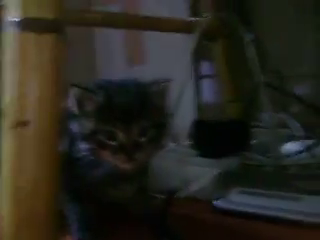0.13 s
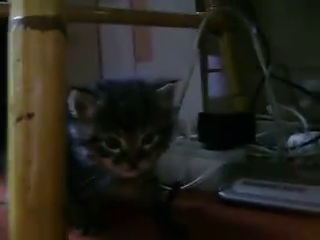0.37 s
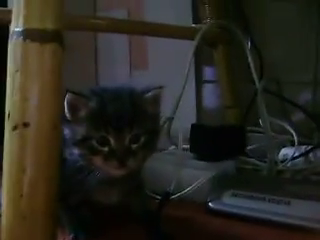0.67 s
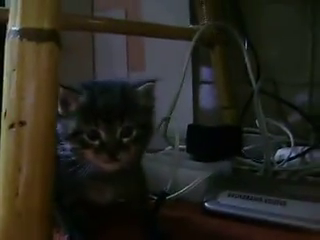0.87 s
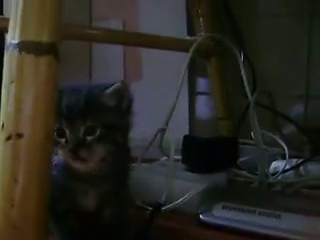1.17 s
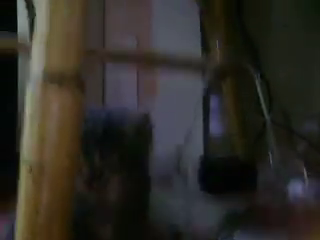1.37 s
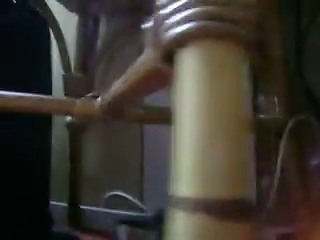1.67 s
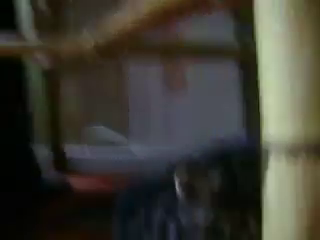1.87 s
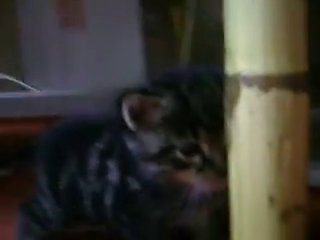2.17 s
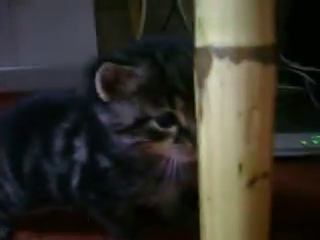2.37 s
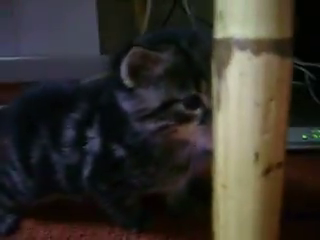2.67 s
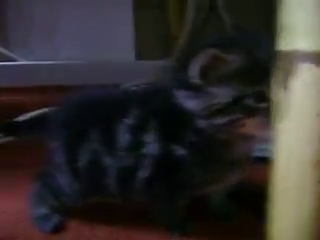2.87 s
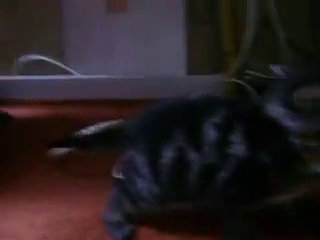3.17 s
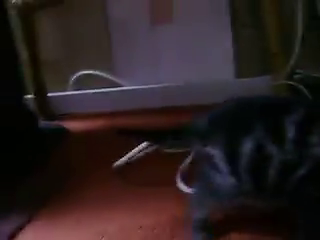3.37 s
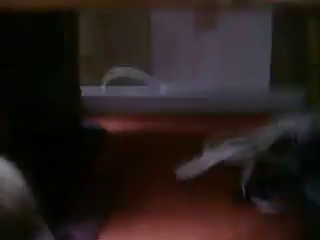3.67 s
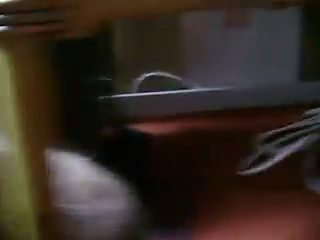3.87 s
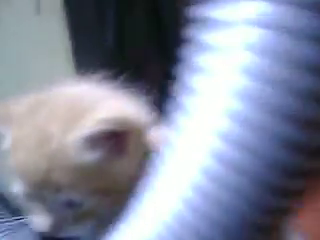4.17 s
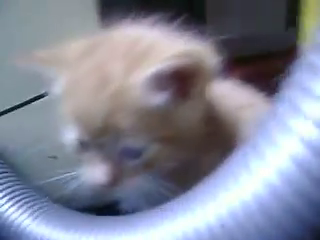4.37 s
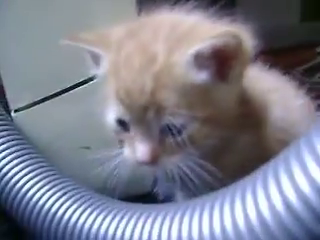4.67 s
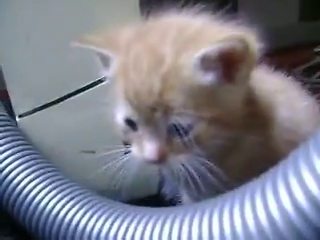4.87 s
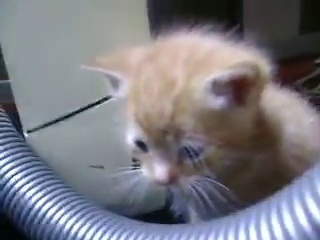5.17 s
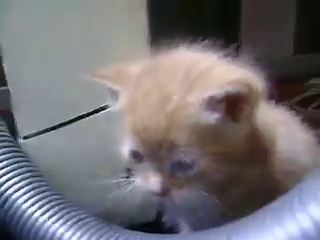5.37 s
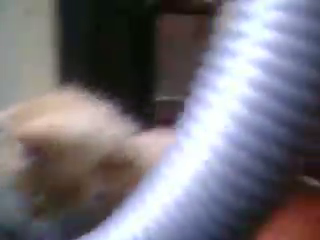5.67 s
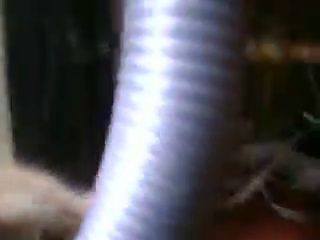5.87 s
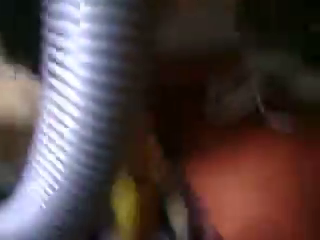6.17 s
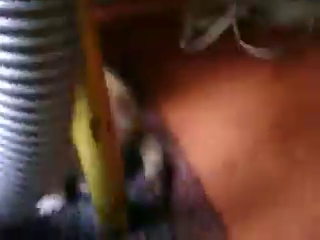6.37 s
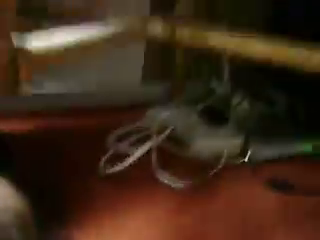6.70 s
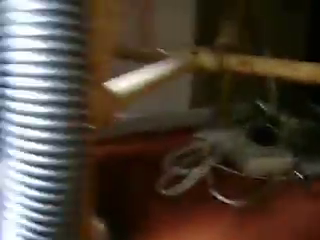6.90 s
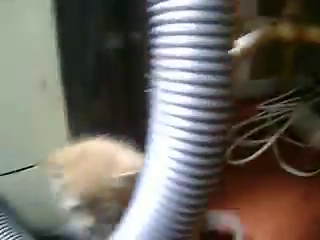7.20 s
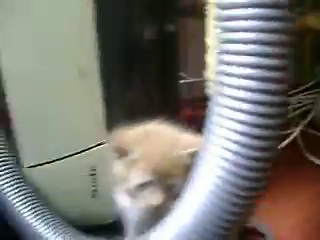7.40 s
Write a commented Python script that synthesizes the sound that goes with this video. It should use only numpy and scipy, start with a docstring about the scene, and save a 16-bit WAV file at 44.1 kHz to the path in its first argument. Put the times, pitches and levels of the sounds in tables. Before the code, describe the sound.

Computer fans and mains hum steadily indoors, a little louder or softer as the hand-held microphone moves. Kittens potter on a carpet in short bursts of light scuffs, hollow taps and tiny friction creaks. About halfway a sharp plastic snap briefly overloads the microphone. After a lull come a softer snap, dull bumps and busier scuffling. The sound is close and dry, with little treble.

```python
"""A steady hum of computer fans and mains comes first, louder or softer as a hand-held camera moves.
Over it kittens potter about on a carpet: light scuffs and taps ring the same few hollow resonances,
and friction creaks and stutters. There are dull bumps and two sharp plastic snaps. The camera's
narrow-band microphone passes little treble, and the louder snap overloads its input."""
import sys
import numpy as np
from scipy import signal
from scipy.fft import rfft, irfft, next_fast_len
from scipy.io import wavfile

SR = 44100
rng = np.random.default_rng(int(sys.argv[2]) if len(sys.argv) > 2 else 0)


def master(y):
    """Save y as 16-bit WAV."""
    cut = np.clip(np.atleast_2d(y).T, -1, 1)
    pcm = np.round(cut * 32767)  # scale
    wavfile.write(sys.argv[1], SR, pcm.astype(np.int16))


N = 332514
T = np.arange(N) / SR

# The computer from the moving camera. Each row: time in seconds, then fan, mains and vent levels in dB.
HUM_LEVELS = [(0.0, -53.5, -60, -54.5), (1.19, -53, -59.5, -55), (2.31, -48, -65.5, -66),
              (2.98, -47.5, -64, -68), (3.21, -48, -68, -55.5), (3.65, -47, -65, -54),
              (4.28, -57, -59.5, -63), (5.06, -61, -61, -70), (5.69, -56.5, -60, -63.5),
              (5.92, -55.5, -65, -59), (6.36, -55.5, -64, -61.5), (6.49, -52, -63.5, -54),
              (7.12, -58.5, -61.5, -65), (7.54, -60.5, -61, -64)]
# Weaker tones of fans, drives and electronics. Each row: frequency in Hz, level in dB.
WHINES = [(135, -76.5), (199.5, -73), (398.8, -69.5), (440, -74.5), (589, -70), (695, -72.5), (738, -71.5),
          (835, -73), (974, -75.5), (1460, -78), (2030, -79), (4000, -80), (5000, -81)]
# Spectrum of fan air and microphone hiss. Each row: frequency in Hz, relative level in dB.
HISS_SPECTRUM = [(20, -7.5), (70, -2), (110, -2), (200, -0.5), (300, -1.5), (450, -1), (620, -2),
                 (850, -0.5), (1100, -2.5), (1400, -7), (2100, -6.5), (3400, -9.5), (4600, -10),
                 (5100, -11)]
# Rubbing strokes. Each row: start and end in seconds, mid-stroke level in dB,
# hardness as treble tilt in dB per octave, slips per second.
SCUFFS = [(0.107, 0.136, -45.5, 3, 2100), (0.146, 0.236, -39.5, 2, 620), (0.273, 0.287, -48, -2, 3000),
          (0.339, 0.366, -57, 6, 2800), (1.376, 1.41, -49, 2, 3000), (1.414, 1.467, -41.5, -1, 230),
          (1.462, 1.521, -45, -3, 300), (1.537, 1.602, -52, -0.5, 530), (1.837, 1.867, -49.5, 0, 4400),
          (3.113, 3.15, -42, -2, 2600), (3.171, 3.26, -52, -5.5, 3600), (3.255, 3.33, -56.5, 3, 3700),
          (3.359, 3.374, -37.5, -1, 1800), (3.605, 3.674, -44, 0.5, 820), (3.705, 3.747, -43, 2, 990),
          (3.783, 3.811, -49, 1, 2900), (3.973, 4.064, -55.5, 7.5, 3100), (4.164, 4.177, -48, 1, 4300),
          (4.19, 4.273, -57, 7, 4100), (5.411, 5.59, -63, 3, 2300), (5.88, 5.919, -51.5, 5, 5000),
          (5.928, 5.979, -44.5, 4, 2050), (6.029, 6.053, -36.5, 0.5, 2000), (6.046, 6.074, -52, 8.5, 3400),
          (6.14, 6.169, -43, -0.5, 2000), (6.295, 6.319, -48.5, 1, 2300), (6.361, 6.448, -46.5, -1, 4500),
          (6.452, 6.478, -42.5, -1, 3200), (6.479, 6.59, -42, -3, 3200), (6.587, 6.646, -43.5, -2, 2600),
          (6.643, 6.733, -53.5, 0.5, 6200), (6.725, 6.762, -47, 2, 2700), (6.775, 6.802, -42, 0, 250),
          (6.814, 6.863, -45, 0.5, 320), (6.875, 6.906, -50.5, -0.5, 2300), (7.174, 7.198, -49, 0, 3700),
          (7.241, 7.284, -56, -7, 310)]
# The hollow shell's body, knock and clack modes. Each row: frequency in Hz, 60 dB decay time in seconds.
SHELL_MODES = [(680, 0.023), (1040, 0.016), (2020, 0.0055)]
# Spectrum of the contact itself. Each row: frequency in Hz, relative level in dB.
CONTACT_SPECTRUM = [(60, -14.5), (350, 0), (900, -10.5), (1500, 1.5), (2600, -9), (3600, -2.5), (4400, -1),
                    (5100, -2), (6000, -2.5)]
# Rubs that catch on one resonance. Each row: start and end in seconds, first and last pitch in Hz,
# level in dB.
CREAKS = [(0.109, 0.125, 2350, 2380, -42), (0.278, 0.285, 2210, 2200, -45), (0.304, 0.313, 2170, 2160, -50),
          (0.178, 0.232, 1900, 1944, -35), (1.415, 1.435, 1394, 1260, -38),
          (1.44, 1.472, 1210, 1065, -36.5), (1.529, 1.605, 971, 735, -45.5), (5.126, 5.159, 931, 810, -53),
          (5.944, 5.954, 2450, 2560, -39), (6.034, 6.048, 1530, 1435, -37.5)]
# Light impacts. Each row: start in seconds, level in dB, hardness in dB per octave,
# frequency in Hz that the struck spot favours, factor on the decay time.
TAPS = [(0.981, -61, 9.5, 1100, .7), (1.427, -45, 3, 1300, .8), (1.4566, -43, -1, 1090, 1.4),
        (1.4983, -44.5, -0.5, 1050, 1.7), (1.525, -41.5, 1.5, 1410, .6), (1.5378, -37.5, 0.5, 1900, 1.8),
        (3.1083, -45, 2, 850, 1), (3.1153, -41, 7.5, 650, 0.24), (3.1368, -35.5, -0.5, 845, 2.9),
        (3.3681, -30.5, 0.5, 1090, 1.6), (3.6355, -45, 4, 645, 0.83), (3.6858, -49.5, -4, 850, 1.8),
        (3.7796, -39.5, 0.5, 1720, 0.63), (4.0174, -41.5, 6, 2000, 0.55), (4.5317, -51.5, 2, 1000, 0.88),
        (5.9021, -36.5, -1, 610, 2.1), (5.9285, -36, -4, 755, 1.6), (6.0109, -34, -5, 800, .3),
        (6.1276, -25.5, 0.5, 960, 2), (6.1589, -30.5, -0.5, 1300, 1.05), (6.359, -31, 5, 1370, 1.85),
        (6.4612, -48.5, 7.5, 1400, 0.66), (6.7707, -33.5, -3.5, 1100, 2.4), (6.7775, -37, 0.5, 750, 1.1),
        (6.7853, -40.5, 0, 1000, 1.8), (6.8291, -46, 4.5, 1100, 1.6), (7.0714, -47, 1.5, 1200, .8),
        (7.0903, -53.5, 2, 1200, 1.1), (7.1456, -49, 1.5, 1100, 1.4), (7.1904, -50.5, -0.5, 1800, 0.99),
        (7.2462, -51, -7, 950, 0.82)]
# Soft impacts. Each row: start in seconds, level in dB, frequency in Hz, 60 dB decay time in seconds.
BUMPS = [(3.9505, -57, 90, .05), (3.951, -34, 334, 0.067), (4.018, -45, 109, .05),
         (5.903, -31.5, 423, 0.056), (6.127, -22, 420, 0.015), (6.301, -38.5, 75, 0.092)]
# Snaps of a plastic part. Each row: start in seconds, gain in dB.
SNAPS = [(3.9506, 1.5), (5.9286, -10)]
# That part's modes. Each row: frequency in Hz, relative level in dB, 60 dB decay time in seconds.
SNAP_MODES = [(890, -25, 0.052), (1000, -6, 0.011), (1194, -19, 0.021), (2140, -17.5, 0.0098),
              (3210, 1.5, 0.0044), (3574, -5.5, 0.0077), (3900, -11, 0.0095), (4700, -8, 0.0062)]
# Faint runs of dull ticks. Each row: start and end in seconds, level of the first tick in dB.
STUTTERS = [(4.854, 4.997, -55), (5.127, 5.172, -63), (5.282, 5.305, -59)]
# The microphone's treble roll-off. Each row: frequency in Hz, gain in dB.
MIC_RESPONSE = [(20, 0), (5100, -0.5), (5500, -5), (5900, -17), (6200, -33.5), (6600, -72)]
# Shares of body, knock, clack and contact noise in a touch of even hardness.
TAP_SHARE_DB, SCUFF_SHARE_DB = [-8.5, -5.5, -6, -1], [-1.5, 0, .5, 0]


def undb(db):
    """Amplitude grows tenfold for every 20 dB."""
    return 10 ** (np.asarray(db) / 20)


def unit(x):
    """Dividing by the rms gives a signal unit power."""
    return x / np.sqrt(np.mean(x ** 2))


def add(out, start, x):
    """Sounds superpose: x joins the mix at a start time in seconds."""
    i = int(start * SR)
    out[i:i + len(x)] += x[:N - i]


def wander(knots_per_s):
    """Interpolating between random values gives a slow fluctuation with a spread near 1."""
    knots = rng.standard_normal(int(knots_per_s * T[-1]) + 2)
    return 1.2 * np.interp(T * knots_per_s, np.arange(len(knots)), knots)


def tone(hz, drift_hz):
    """Phase is the integral of frequency: a slightly wandering sine of rms 1."""
    turns = np.cumsum(hz + drift_hz * wander(3.166)) / SR + rng.random()
    return np.sqrt(2) * np.sin(2 * np.pi * turns)


def noise_band(hz, width_hz):
    """Two resonators in series confine noise to a band with steep skirts."""
    b, a = signal.iirpeak(hz, hz / width_hz, fs=SR)
    return unit(signal.lfilter(b, a, signal.lfilter(b, a, rng.standard_normal(N))))


def computer(fan_hz=243.2, mains_hz=119.9):
    """Periodic sources give tones: fan, mains and faint whines. Rushing air gives bands of noise."""
    times, *levels_db = np.transpose(HUM_LEVELS)
    fan_gain, mains_gain, vent_gain = [undb(np.interp(T, times, db)) for db in levels_db]
    # the case drones with the fan; the vent lets out air and the fan's octave
    fan = fan_gain * (tone(fan_hz, drift_hz=.17) + undb(-10) * noise_band(206, 88))
    vent = vent_gain * (undb(-5) * noise_band(440, 350) + undb(-9) * tone(2 * fan_hz, drift_hz=.36))
    mains = mains_gain * tone(mains_hz, drift_hz=.03)
    whines = sum(undb(db) * (1 + .57 * wander(1.245)) * tone(hz, drift_hz=.604) for hz, db in WHINES)
    return fan + vent + mains + whines


def gain_curve(points, size):
    """A spectrum runs straight in dB over log frequency between (Hz, dB) points: one gain per FFT bin."""
    hz, db = np.transpose(points)
    bin_hz = np.arange(size // 2 + 1) * SR / size
    return undb(np.interp(np.log(bin_hz + 1), np.log(hz), db))


def colour(x, points):
    """Filtering multiplies the spectrum by a gain curve."""
    size = next_fast_len(N, True)
    return irfft(rfft(x, size) * gain_curve(points, size), size)[..., :N]


def hiss(level_db=-50.5):
    """Random fluctuations of distant air and of the microphone form a steady broadband floor."""
    return undb(level_db) * unit(colour(rng.standard_normal(N), HISS_SPECTRUM))


def mode(hz, t60, size=4096):
    """A damped resonance decays exponentially, by 60 dB in t60 seconds."""
    t = T[:size]
    return np.sin(2 * np.pi * hz * t) * np.exp(-np.log(1000) * t / t60)


def contact_response(size=1024):
    """Sound follows its cause: the minimum-phase impulse response of the contact's spectrum."""
    cepstrum = irfft(np.log(gain_curve(CONTACT_SPECTRUM, size)))
    cepstrum[1:size // 2] *= 2
    cepstrum[size // 2 + 1:] = 0
    return irfft(np.exp(rfft(cepstrum)))


def shares(share_db, hardness, pivot_hz=1050, contact_hz=3100):
    """A harder touch favours high frequencies, tilting the gains of shell modes and contact noise."""
    octaves = np.log2(np.array([hz for hz, _ in SHELL_MODES] + [contact_hz]) / pivot_hz)
    return undb(np.array(share_db) + hardness * octaves)


def stroke(length_s, edge_s):
    """Pressure builds and releases smoothly around the ends of a rub; returns time and pressure."""
    margin = 4 * edge_s
    t = np.arange(-margin, length_s + margin, 1 / SR)
    rise = .5 + .5 * np.tanh(t / edge_s)
    fall = .5 + .5 * np.tanh((length_s - t) / edge_s)
    return t, rise * fall


def scuffs(spread_db=5, arch_db=5.5, decay_factor=.44, size=16384):
    """Friction drives the shell with uneven slips, gritty when few, while the touch damps its modes."""
    out = np.zeros(N)
    responses = [mode(hz, t60 * decay_factor, size=1024) for hz, t60 in SHELL_MODES]
    responses.append(contact_response())
    for start, end, db, hardness, slips_per_s in SCUFFS:
        t, pressure = stroke(end - start, edge_s=.004)
        off_centre = np.minimum((2 * t / (end - start) - 1) ** 2, 1)
        envelope = pressure * undb(db - arch_db * off_centre)  # firmest in mid-stroke
        strength, direction, grain = rng.standard_normal((3, size))
        slipping = rng.random(size) < slips_per_s / SR
        slips = slipping * undb(spread_db * strength) * np.sign(direction)
        force = (slips + .14 * grain)[:len(t)]
        for k, (response, gain) in enumerate(zip(responses, shares(SCUFF_SHARE_DB, hardness))):
            rubbed = unit(signal.fftconvolve(force, response)[:len(t)])
            add(out, start + t[0], (-1) ** k * gain * envelope * rubbed)
    return out


def creaks(width_hz=210, size=8192):
    """Friction feeds a narrow resonance whose pitch slides as the contact moves."""
    out = np.zeros(N)
    lowpass = signal.butter(2, width_hz / 2, fs=SR, output="sos")
    for start, end, from_hz, to_hz, db in CREAKS:
        t, pressure = stroke(end - start, edge_s=.0051)
        noise = rng.standard_normal(size) + 1j * rng.standard_normal(size)
        amplitude = signal.sosfilt(lowpass, noise)[-len(t):]
        turns = np.cumsum(np.interp(t, [0, end - start], [from_hz, to_hz])) / SR
        vibration = unit(np.real(amplitude * np.exp(2j * np.pi * turns)))
        add(out, start + t[0], undb(db) * pressure * vibration)
    return out


def room(x, t60=.12, wet_db=-27, size=8192):
    """Absorption in the carpeted corner leaves only a faint, short reverberation."""
    tail = rng.standard_normal(size) * np.exp(-np.log(1000) * T[:size] / t60) * (T[:size] > .003)
    tail /= np.sqrt(np.sum(tail ** 2))
    return x + undb(wet_db) * signal.oaconvolve(x, tail)[:N]


def spot_lift(spot_hz, lift_db=9, width_octaves=.63):
    """The point of impact favours modes near one pitch; the contact noise keeps a gain of 1."""
    distance = np.log2(np.array([hz for hz, _ in SHELL_MODES]) / spot_hz) / width_octaves
    return undb(np.append(lift_db * np.exp(-distance ** 2), 0))


def taps(events, chatter_s=.0036, graze_db=-16, graze_s=.0046, detune=.012, size=2048):
    """An impact excites free vibration: a graze swells into it, the contact chatters, the shell rings."""
    out, contact = np.zeros(N), contact_response()
    head = SR // 100  # 10 ms: the length of the graze, and the span that sets each part's rms
    for start, db, hardness, spot_hz, decay_factor in events:
        force = .12 * rng.standard_normal(size) * np.exp(-T[:size] / chatter_s)
        force[0] += 1  # the impact itself, ahead of its chatter
        # each touch loads the shell a little differently
        parts = [mode(hz * (1 + detune * rng.standard_normal()), t60 * decay_factor, size)
                 for hz, t60 in SHELL_MODES]
        parts.append(signal.fftconvolve(force, contact)[:size])
        parts = [part / np.sqrt(np.mean(part[:head] ** 2)) for part in parts]
        gains = undb(db) * shares(TAP_SHARE_DB, hardness) * spot_lift(spot_hz)
        # neighbouring modes swing in opposite directions
        blow = sum((-1) ** k * gains[k] * part for k, part in enumerate(parts))
        graze = rng.standard_normal(head) * np.exp(T[:head] / graze_s)
        graze *= undb(graze_db) / np.sqrt(np.sum(graze ** 2))
        add(out, start - T[head], signal.fftconvolve(np.append(graze, 1), blow))
    return out


def bumps():
    """A soft impact excites one low, heavily damped mode: a dull thud."""
    out = np.zeros(N)
    for start, db, hz, t60 in BUMPS:
        add(out, start, undb(db) * mode(hz, t60))
    return out


def snaps(cutoff_hz=620, rise_s=.0002, size=4096):
    """A small radiator gives little bass: a plastic part snaps close by and rings in its high modes."""
    out = np.zeros(N)
    ring = sum(undb(db) * mode(hz, t60, size) for hz, db, t60 in SNAP_MODES)
    ring *= 1 - np.exp(-T[:size] / rise_s)
    radiated = signal.sosfilt(signal.butter(2, cutoff_hz, "high", fs=SR, output="sos"), ring)
    for start, db in SNAPS:
        add(out, start, undb(db) * radiated)
    return out


def stutter_ticks(period_s=.0192, fade_db_per_s=53, hardness=-13.5, spot_hz=890, decay_factor=.78):
    """Stick-slip motion repeats evenly, giving runs of soft, weakening ticks as rows for taps()."""
    return [(start + lag, db - fade_db_per_s * lag, hardness, spot_hz, decay_factor)
            for start, end, db in STUTTERS for lag in np.arange(0, end - start, period_s)]


def scene():
    """The kittens' play and its reverberation superpose on the hum and hiss, in one channel."""
    play = taps(TAPS + stutter_ticks()) + scuffs() + creaks() + snaps() + bumps()
    return (room(play) + computer() + hiss())[None]


def record(dry, ceiling=.62, top_hz=15500):
    """The microphone limits bandwidth; its amplifier clips, and a low-pass trims the top overtones."""
    clipped = np.clip(colour(dry, MIC_RESPONSE), -ceiling, ceiling)
    return signal.sosfilt(signal.ellip(8, .2, 70, top_hz, fs=SR, output="sos"), clipped)


dry = scene()
out = record(dry)
master(out)
```